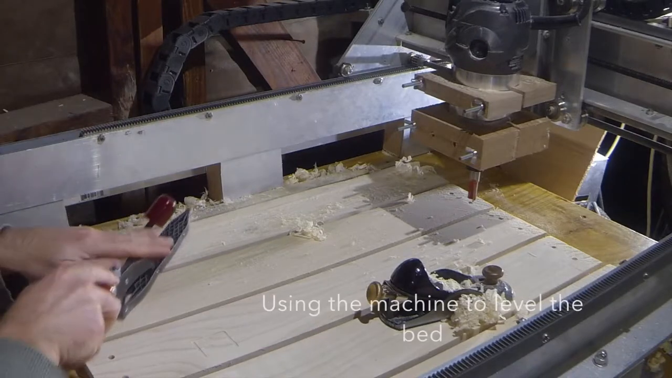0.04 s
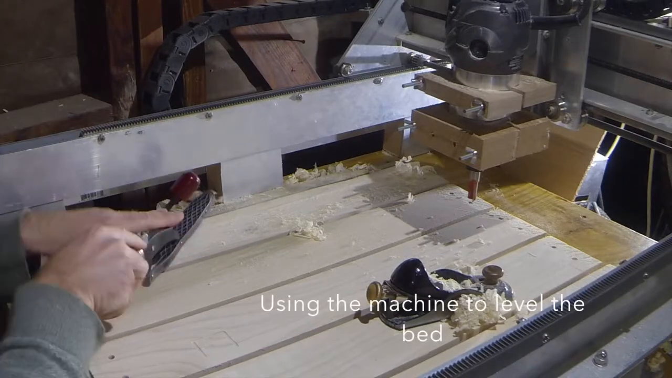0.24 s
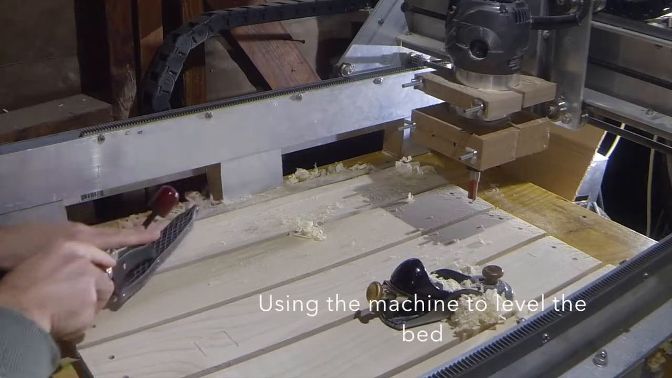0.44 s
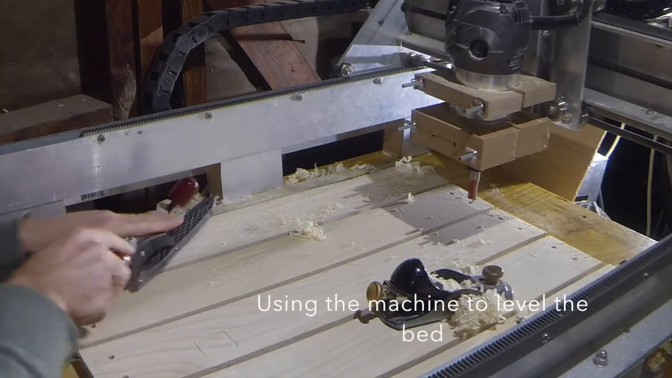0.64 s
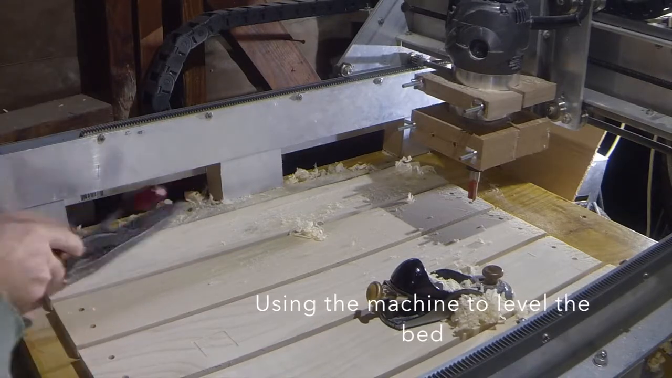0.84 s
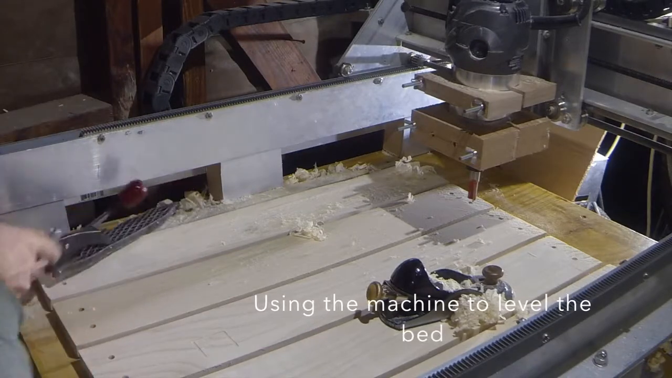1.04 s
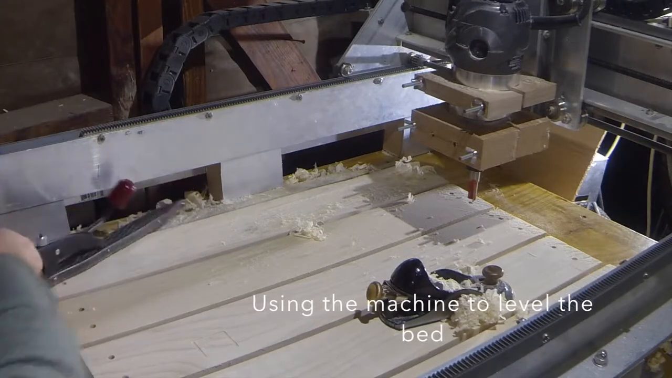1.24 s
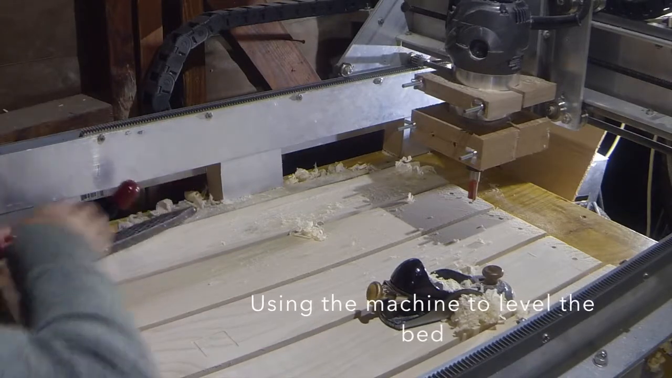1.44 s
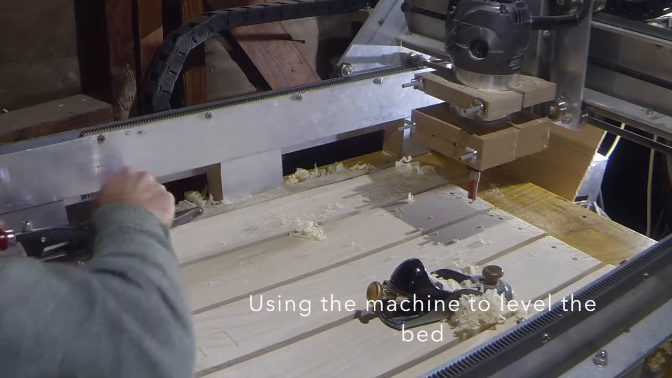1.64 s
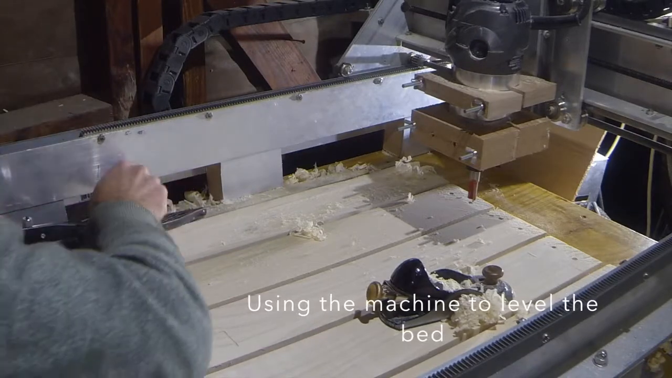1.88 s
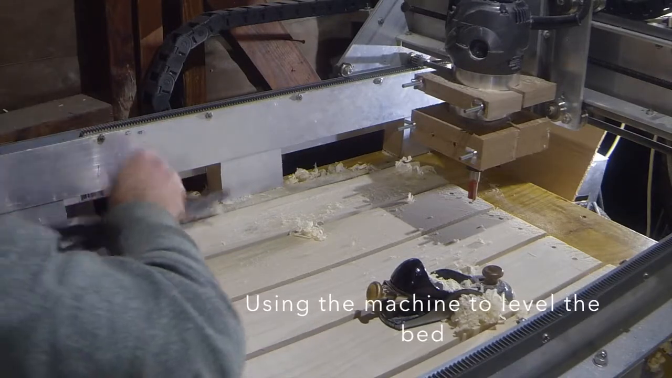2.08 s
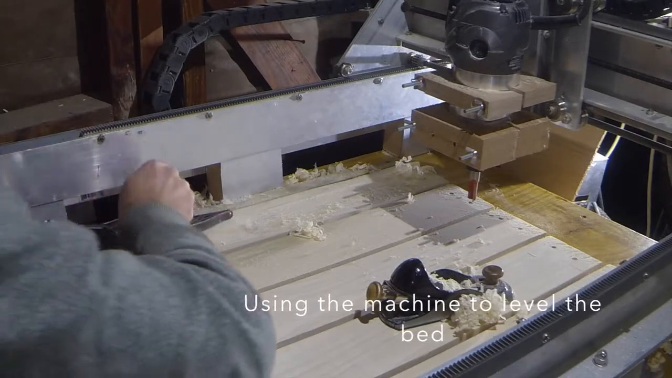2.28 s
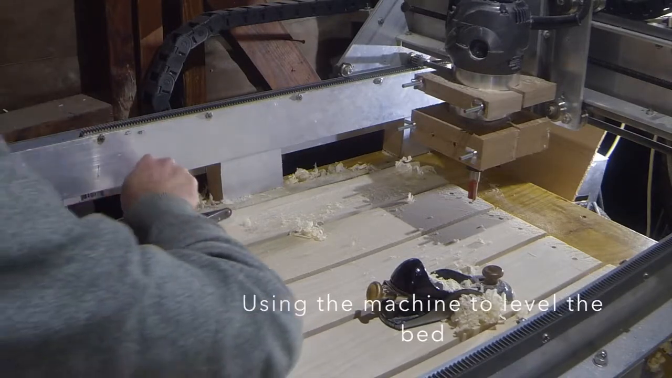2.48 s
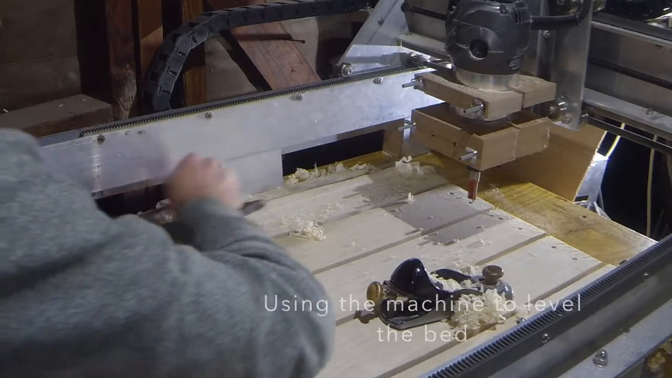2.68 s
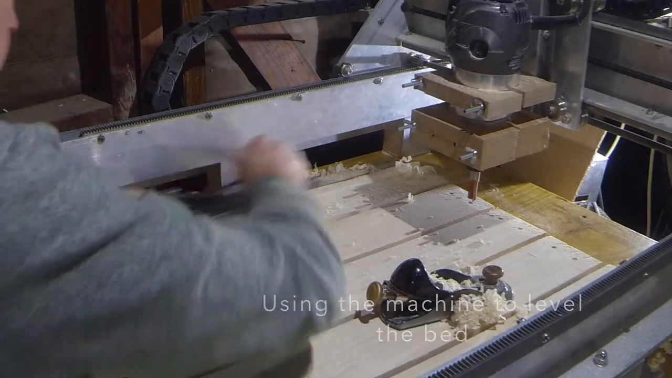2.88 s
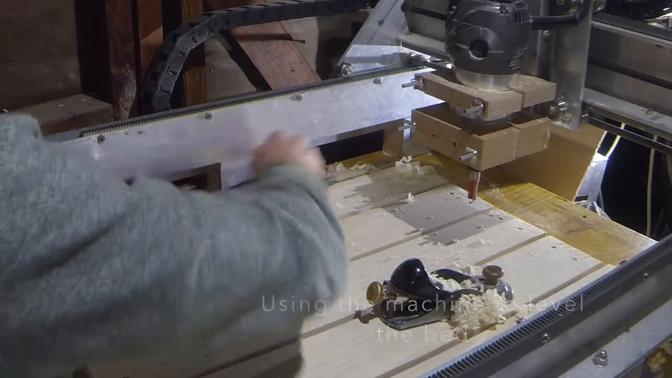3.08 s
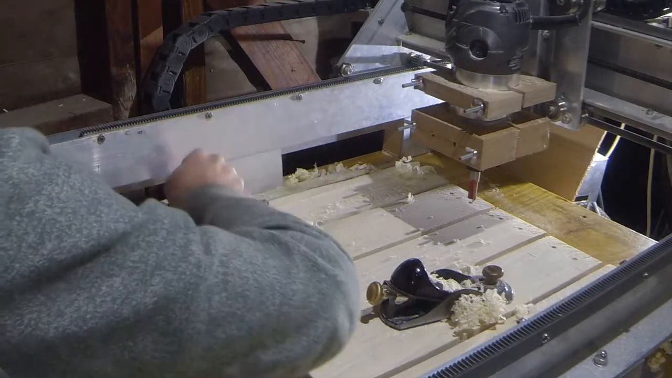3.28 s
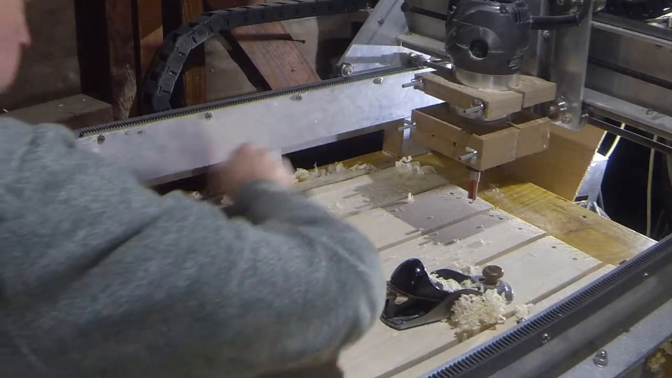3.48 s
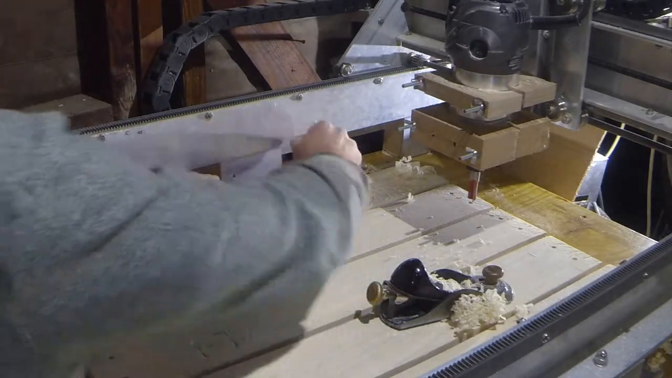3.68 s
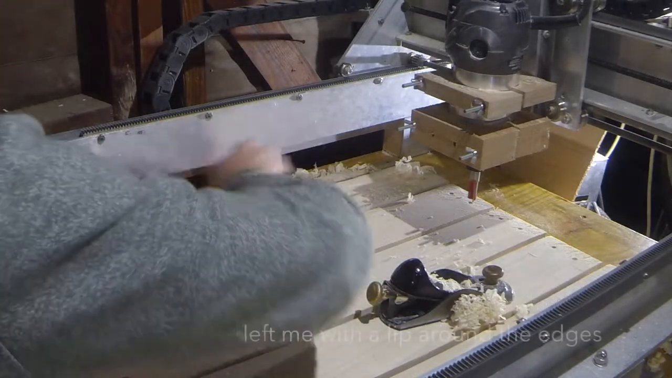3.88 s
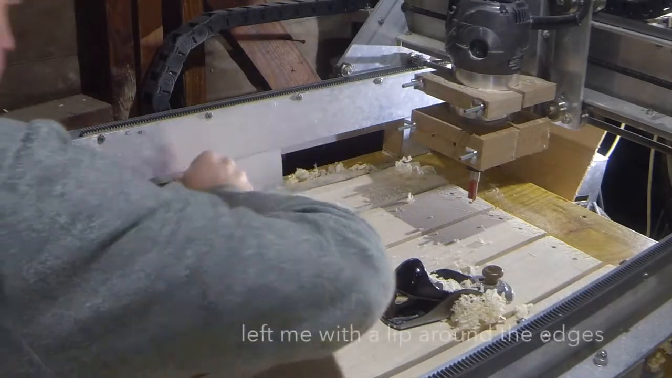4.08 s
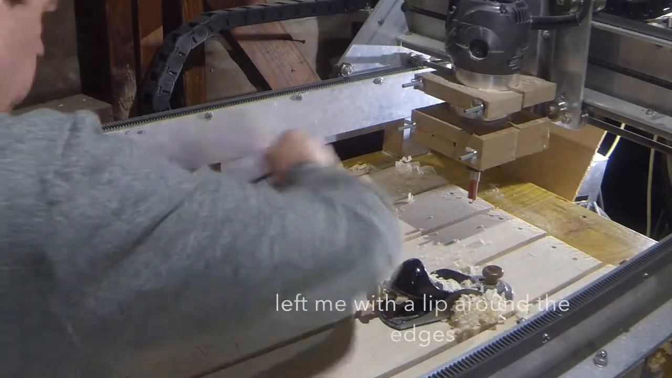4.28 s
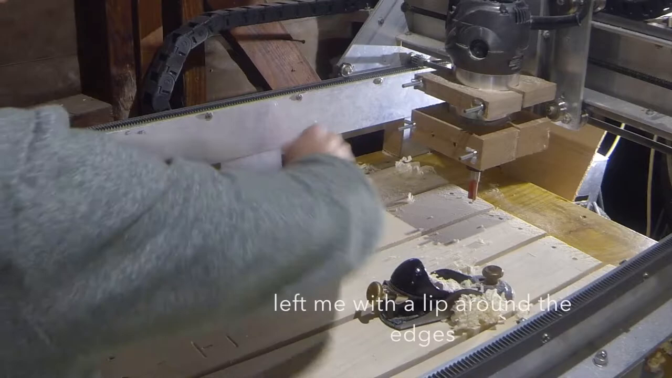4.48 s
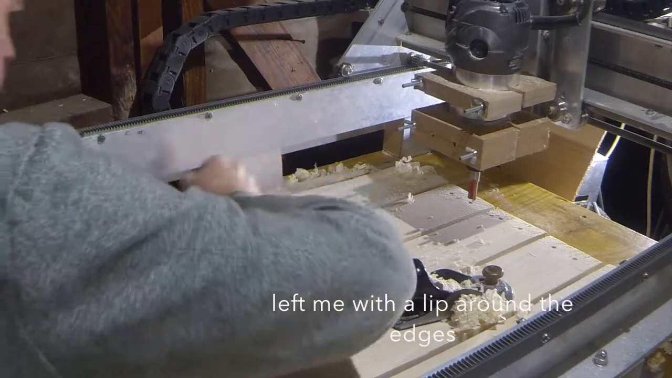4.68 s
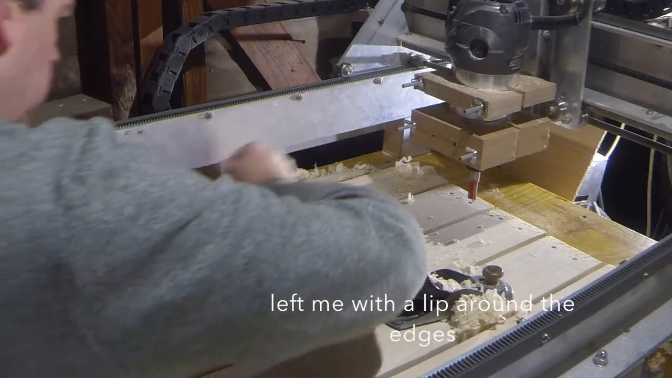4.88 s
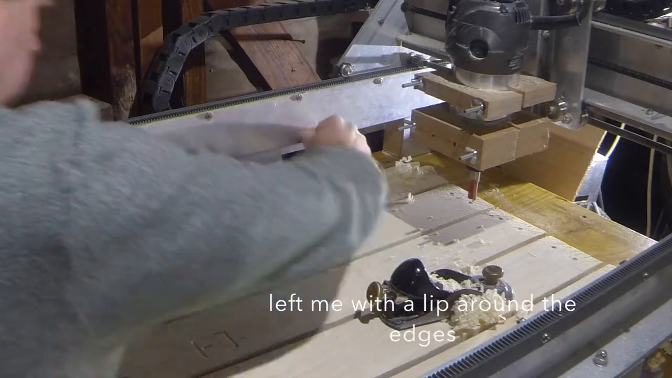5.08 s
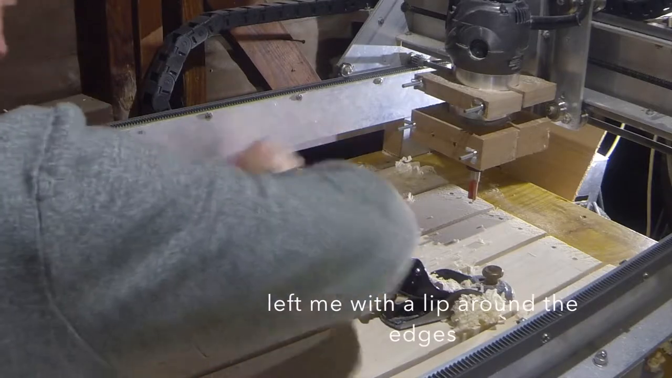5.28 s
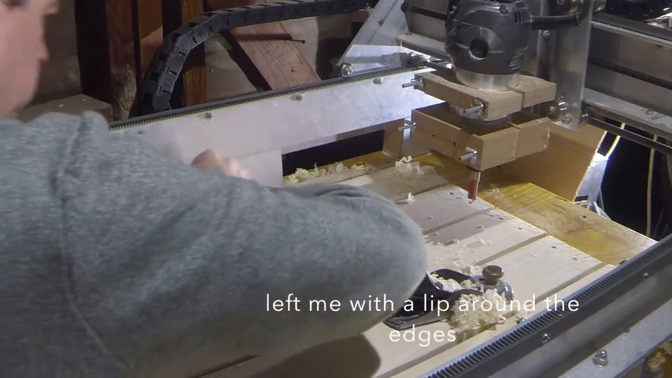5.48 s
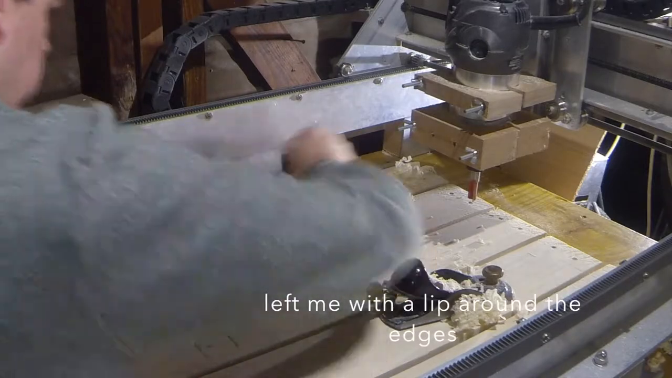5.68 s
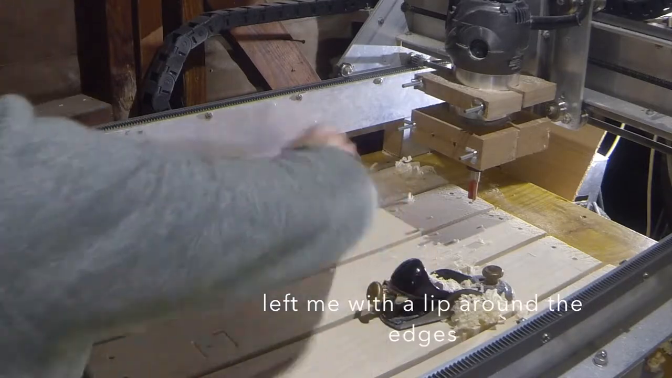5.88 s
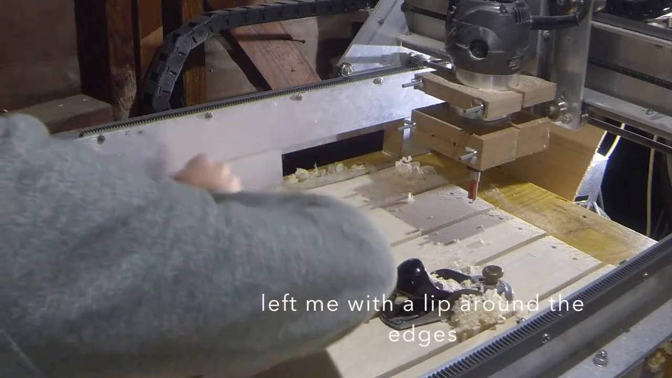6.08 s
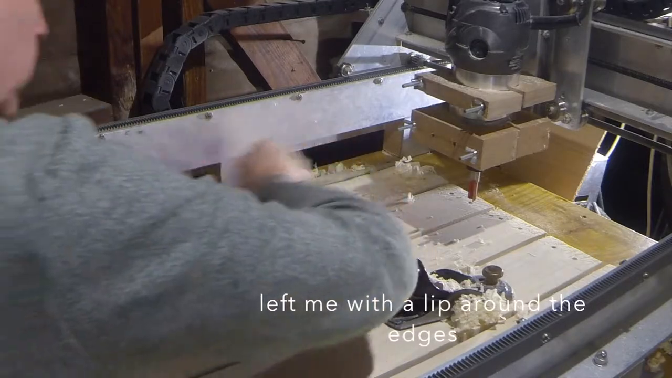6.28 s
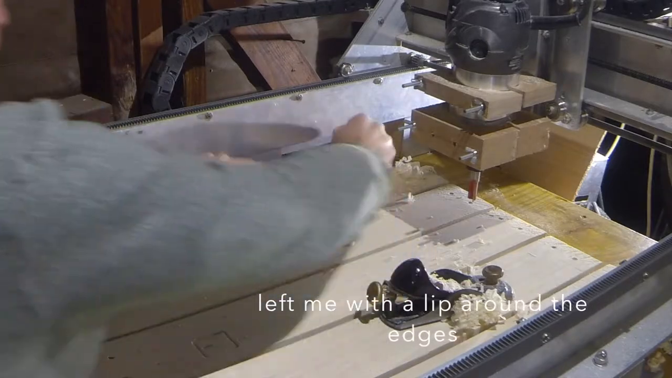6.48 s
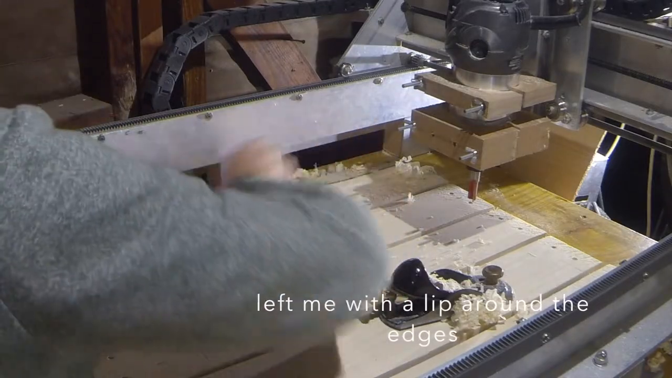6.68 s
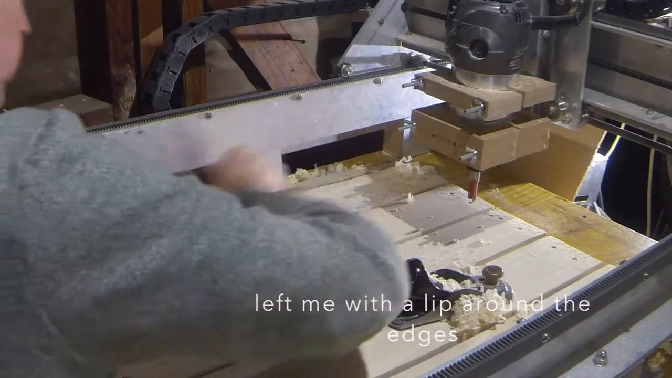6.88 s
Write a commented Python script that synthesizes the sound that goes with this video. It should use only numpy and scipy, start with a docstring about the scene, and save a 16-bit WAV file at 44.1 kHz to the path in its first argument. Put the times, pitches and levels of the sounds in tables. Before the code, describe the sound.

A hand rasp scrapes a wooden bed in short strokes, pauses for one sharp knock, then settles into long rhythmic pushes with lighter drags back.

```python
"""Hand rasp on a wooden bed

A hand rasp works the edge of a wooden machine bed in a small workshop: short strokes, a pause in which the
tool is turned round and set down with a sharp knock, then long even pushes with lighter drags back between.
Teeth are random chips plus noise, ringing the boards' resonances, louder and brighter with the hand's speed.
Knocks are decaying sines with ringing boards; frame rumble, shop air and room reverberation lie behind.
"""
import sys
import numpy as np
from scipy import signal
from scipy.io import wavfile
from scipy.ndimage import uniform_filter1d

SR = 44100
rng = np.random.default_rng(int(sys.argv[2]) if len(sys.argv) > 2 else 0)


def store_wav(level_fs):
    """Save 16-bit WAV to argv[1]."""
    pcm = np.round(np.clip(np.atleast_2d(level_fs), -1, 1) * 32767)
    wavfile.write(sys.argv[1], SR, pcm.T.astype(np.int16))


N = 306054
TIME_S = np.arange(N) / SR
HALF_S = SR // 2  # samples in half a second


# Strokes: (start [s], end [s], fastest point [share of stroke], bite of the teeth [dB before group trim],
# weight on the boards [dB re bite], sharpness of the cut [dB re bite])
# Short strokes to and fro, before the tool is turned round
NIBBLES = [(-0.082, 0.226, 0.65, -37.5, -3.5, -6), (0.203, 0.465, 0.38, -39.5, -1, -10.5),
           (0.432, 0.626, 0.44, -37, -2.5, -7.5), (0.584, 0.93, 0.31, -48, 0.5, -8)]
# The tool brushes the wood while the grip changes: same columns
BRUSHES = [(1.14, 1.284, .6, -64.5, -12, -4), (1.22, 1.395, 0.12, -64, 12, -12),
           (1.297, 1.48, 0.27, -56, -5, -7.5), (1.557, 1.775, 0.078, -63.5, -10, -5),
           (1.822, 1.969, 0.38, -58.5, -27, -6)]
# Long cutting strokes: same columns
PUSHES = [(2.41, 2.968, 0.77, -39.5, -6.5, -8), (3.262, 3.656, 0.73, -36, -4.5, -7.5),
          (3.99, 4.347, 0.7, -33, -6.5, -8), (4.667, 5.053, 0.66, -33.5, -6, -8.5),
          (5.38, 5.741, 0.6, -32, -6, -9), (6.062, 6.446, 0.66, -32, -6, -8.5),
          (6.738, 7.105, 0.51, -31, -6, -8)]
# The rasp is dragged back: same columns
DRAGS = [(2.936, 3.249, 0.5, -42.5, -5, -3), (3.64, 3.958, 0.52, -40, -7, -4),
         (4.358, 4.674, 0.37, -41.5, 1, -4.5), (5.056, 5.385, 0.4, -39.5, -6.5, -4.5),
         (5.743, 6.075, 0.44, -42, -0.5, -3), (6.439, 6.746, 0.47, -38, -6, -3.5)]
# Growth of gain with hand speed: (boards [exponent], rasping [exponent], hiss [exponent])
NIBBLE_LAW = (1.24, 2.15, 3.04)
PUSH_LAW = (1.08, 1.44, 1.66)
DRAG_LAW = (0.26, 0.85, 1.63)
# Scrape colour per way of moving the tool: (frequency [Hz], relative gain [dB])
NIBBLE_COLOUR = [(76, -18), (130, -3), (282, 2), (531, 0), (744, -8), (908, -4.5), (1220, -11.5),
                 (1550, -7), (1750, -14.5), (1850, -11), (2310, -14), (3360, -19.5), (4620, -26),
                 (7140, -33.5), (14900, -58)]
PUSH_COLOUR = [(76, -65), (130, -23), (172, -8.5), (227, -4), (260, 0), (501, 2), (587, -8.5), (674, 3),
               (872, -2), (1110, 4), (1970, -10.5), (4260, -22), (4900, -26), (8710, -36.5), (14900, -57)]
DRAG_COLOUR = [(76, -51), (130, -34), (168, -0.5), (231, -12), (260, -4), (419, 4.5), (575, 2), (806, 4),
               (1270, 4), (2130, -14.5), (2310, -17.5), (3430, -24.5), (4800, -31), (9060, -45),
               (14900, -64)]
# Teeth dig in deeper (or shallower) for a moment: (middle [s], length [s], level change [dB])
DIGS = [(0.098, 0.051, 1.5), (0.534, 0.059, 1.5), (2.514, 0.21, 3), (2.828, 0.16, 3.5), (3.46, 0.18, 3),
        (4.079, 0.02, 3), (4.285, 0.037, 2), (4.715, 0.046, 5.5), (4.983, 0.11, 1.5), (5.195, .05, -1.5),
        (6.37, 0.033, 4), (6.497, 0.072, 5)]
PRESSURE_RMS_DB, PRESSURE_HZ = 0.84, 10.4


def rasp():
    """Short strokes, cutting pushes and sliding returns under the uneven pressure of the hand."""
    nibbling = teeth(chips_per_s=1500, spread_db=0.5, rub=1.0, grab_db=1.5, grab_hz=90)
    cutting = teeth(chips_per_s=1800, spread_db=1.5, rub=0.88, grab_db=0.5, grab_hz=79)
    cutting = travel(cutting, patchy_db=2.02, patch_hz=170, patch_s=0.04)
    sliding = teeth(chips_per_s=3000, spread_db=-1.5, rub=0.55, grab_db=-0.13, grab_hz=60)
    sliding = travel(sliding, patchy_db=3.5, patch_hz=130, patch_s=0.06)

    nibbles = amp(-1.1) * scrape(NIBBLES + BRUSHES, NIBBLE_LAW, nibbling, NIBBLE_COLOUR)
    pushes = amp(-0.32) * scrape(PUSHES, PUSH_LAW, cutting, PUSH_COLOUR)
    drags = amp(-0.93) * scrape(DRAGS, DRAG_LAW, sliding, DRAG_COLOUR)

    digs_db = sum(db * swell(middle_s, length_s) for middle_s, length_s, db in DIGS)
    pressure_db = PRESSURE_RMS_DB * wander(PRESSURE_HZ) + digs_db
    return amp(pressure_db) * (nibbles + pushes + drags)


STICK_S, STICK_DB = 0.036, -6  # teeth stick at the start of a stroke, then break loose


def scrape(strokes, law, drive, spectrum, body_hz=600, edge_hz=2000):
    """Teeth drive the bed; each band's gain grows as its own power of hand speed."""
    sound = colour(drive + boards(drive), spectrum)
    body = below(sound, body_hz)
    dull = below(sound, edge_hz)
    bands = (body, dull - body, sound - dull)  # boards, rasping, hiss

    power = np.zeros((3, N))
    for start_s, end_s, fastest, bite_db, weight_db, sharp_db in strokes:
        pace = speed(start_s, end_s, fastest)
        moving = pace > 0
        stuck = 1.0 * (TIME_S[moving] < start_s + STICK_S)
        stuck_db = STICK_DB * uniform_filter1d(stuck, size=200)
        levels_db = (bite_db + weight_db, bite_db, bite_db + sharp_db)
        for band, db in enumerate(levels_db):
            gain = amp(db + stuck_db) * pace[moving] ** abs(law[band])
            power[band, moving] += gain ** 2
    return sum(np.sqrt(p) * unit(part) for p, part in zip(power, bands))


def teeth(chips_per_s, spread_db, rub, grab_db, grab_hz):
    """Chips of uneven size snap off over a smooth rub; rows of teeth grab and let go."""
    size = amp(spread_db * np.minimum(rng.exponential(1, N), 4))
    snaps = rng.random(N) < chips_per_s / SR
    chips = size * rng.choice([-1, 1], N) * snaps
    grab = unit(below(rng.standard_normal(N + SR), grab_hz, order=2)[HALF_S:][:N])
    return (unit(chips) + rub * rng.standard_normal(N)) * amp(grab_db * grab)


def travel(x, patchy_db, patch_hz, patch_s, size=1024):
    """As the contact slides along the board, narrow bands catch and fade at random."""
    overlap = size * 3 // 4
    hz, t, z = signal.stft(x, SR, nperseg=size, noverlap=overlap)
    patches = rng.standard_normal(z.shape)
    patches = uniform_filter1d(patches, max(round(patch_hz / hz[1]), 1), axis=0)
    patches = uniform_filter1d(patches, max(round(patch_s / t[1]), 1), axis=1)
    patched = z * amp(patchy_db * unit(patches))
    return signal.istft(patched, SR, nperseg=size, noverlap=overlap)[1][:N]


# Resonances of the bed with the rasp on it: (frequency [Hz], width [Hz], gain over the drive [dB])
BED_MODES = [(170.6, 10.4, 13), (272, 8.7, 16), (307, 11.5, 9), (316, 7.8, 9), (356.8, 19, 13.5),
             (427, 16, 9.5), (516, 60, 3), (646, 23, -3), (721, 28, -2.5), (753, 49, -12.5), (807, 17.5, 3),
             (941, 62, -4.5), (1018, 19, -3.5), (1150, 28, -8.5), (1298, 22, 1.5), (1494, 34, 3),
             (1597, 37, -0.5), (1627, 4.1, 11), (1850, 10, -30), (2133, 55, 3.5), (2590, 48, -6),
             (2886, 72, 5.5), (3397, 310, 5.5), (3730, 400, 4), (4270, 160, 8), (5150, 190, -2.5),
             (6700, 1100, -7), (8650, 200, 0)]


def boards(x):
    """Bed modes ring under drive x; a wider resonance dies sooner."""
    t = TIME_S[:HALF_S]
    ring = np.zeros(HALF_S)
    for hz, width_hz, db in BED_MODES:
        decay = np.exp(-np.pi * width_hz * t)
        peak_scale = 2 * np.pi * width_hz / SR  # same peak response at any width
        ring += amp(db) * peak_scale * decay * np.cos(2 * np.pi * hz * t)
    return signal.oaconvolve(x, ring)[:len(x)]


def speed(start_s, end_s, fastest):
    """The hand speeds up from rest and slows to rest again; top speed 1."""
    turn_s = start_s + np.clip(fastest, 0.02, 0.98) * (end_s - start_s)
    return np.sin(np.pi * np.interp(TIME_S, [start_s, turn_s, end_s], [0, 0.5, 0]))


def motion(strokes):
    """The hand's speed through a series of strokes."""
    return sum(speed(*row[:3]) for row in strokes)


# Rasp judders or squeaks for a moment: (start [s], length [s], frequency [Hz], level [dB rms])
JUDDERS = [(0.321, 0.087, 262, -35.5), (3.769, 0.018, 1070, -49), (3.754, 0.045, 3390, -50.5),
           (4.433, 0.015, 990, -35), (5.273, 0.031, 3020, -55.5), (5.85, 0.034, 2940, -52),
           (5.933, 0.018, 2960, -47)]


def judders(waver=0.012):
    """Stick and slip lock briefly onto one resonance: a wavering sine."""
    out = np.zeros(N)
    for start_s, length_s, hz, db in JUDDERS:
        drift = unit(uniform_filter1d(rng.standard_normal(SR), size=300))
        drift = drift[:round(length_s * SR)]
        tone = np.sin(2 * np.pi * np.cumsum(hz * (1 + waver * drift)) / SR)
        burst = unit(tone * signal.windows.tukey(len(tone), 0.7))
        add(out, start_s, amp(db) * burst)
    return out


# Teeth skip over the edge as the rasp is drawn off: (start [s], length [s], level [dB])
SNAGS = [(0.758, 0.014, -41), (0.776, 0.012, -37), (0.793, 0.0129, -36.5), (0.812, 0.014, -44.5)]
# Colour of the skips: (frequency [Hz], relative gain [dB])
SNAG_COLOUR = [(120, -41), (200, -36), (350, 3), (484, 3.5), (601, -17), (732, -7.5), (1870, -18.5),
               (2880, -12.5), (7000, -35), (10000, -38), (14900, -63)]


def snags():
    """Each skip tears a quick cluster of chips."""
    torn = teeth(chips_per_s=1500, spread_db=2.0, rub=0.43, grab_db=2.5, grab_hz=200)
    chips = unit(colour(torn, SNAG_COLOUR))
    grip = np.zeros(N)
    for start_s, length_s, db in SNAGS:
        add(grip, start_s, amp(db) * signal.windows.tukey(round(length_s * SR), 0.5))
    return grip * chips


# The arm's weight rocks a deep mode of the bed: (middle [s], length [s], level [dB])
ROCKS = [(2.56, 0.18, -51), (3.196, 0.065, -53), (3.745, .1, -43.5), (4.407, 0.079, -47),
         (4.505, 0.074, -50), (5.032, 0.15, -51), (5.697, 0.15, -41), (5.856, 0.067, -43),
         (6.313, 0.11, -51), (6.457, 0.28, -44.5)]


def boom(hz=173, width_hz=26, murmur_db=-58):
    """Friction keeps a deep bed mode murmuring; it swells when the arm rocks the bed."""
    band_hz = [hz - width_hz / 2, hz + width_hz / 2]
    ring = signal.lfilter(*signal.butter(2, band_hz, "band", fs=SR), rng.standard_normal(N))
    murmur = amp(murmur_db) * np.sqrt(motion(PUSHES + DRAGS))
    rocking = sum(amp(db) * swell(middle_s, length_s) for middle_s, length_s, db in ROCKS)
    return unit(ring) * (murmur + rocking)


# Tool knocks on the bed: (time [s], crack peak [dB], cutoff above which the blow is dull [Hz],
# drive to the boards [dB before ring_db], clink of the blade [dB re crack, before softening])
KNOCKS = [(0.764, -40, 900, 8, -24), (0.977, -51, 1980, 3, -6), (1.239, -42, 895, 5, -24),
          (1.459, -47.5, 500, -2, -28), (2.0437, -36.5, 2200, -11, 1), (2.0464, -22, 395, -8, -43),
          (2.0893, -9, 2100, -0.5, -23)]
# Short crack of the tool's frame: (frequency [Hz], relative level [dB], t60 [s])
CRACK_MODES = [(325, -8.5, 0.055), (540, 1.5, 0.04), (785, 4, 0.04), (930, -7, 0.025), (1024, 18.5, 0.015),
               (1570, 8, 0.039), (1870, -10, .035), (2164, -7.5, .04), (2450, -19, 0.025), (2800, -15, .04)]
# Steel blade: (frequency [Hz], relative level [dB], t60 [s])
BLADE_MODES = [(2170, -5, .025), (2850, -3, 0.027), (3130, 2, .022), (3470, 1.5, 0.026), (3770, -6, .03),
               (4220, -7, 0.022), (5350, -16, .025), (7200, -30, .02)]
# Tool settling on the wood after a blow: (frequency [Hz], relative gain [dB])
CLATTER_COLOUR = [(180, -45), (300, -13), (447, -6.5), (577, -14), (1590, -24.5), (2570, -32.5),
                  (3230, -39), (5240, -64), (9000, -68), (11700, -100), (19800, -120)]
# Reflections off the gantry and the wall: (delay [s], level [dB])
ECHOES = [(.0042, -11.5), (.0098, -13)]
CLATTER_T60_S = 0.14


def knocks(ring_db=4, push_hz=650, held_t60_s=0.5, clatter_db=-17, clink_hz=5000):
    """The tool cracks, clinks and settles; its slower push rings the hand-damped boards."""
    out = np.zeros(N)
    t = TIME_S[:HALF_S]
    crack = struck(CRACK_MODES)
    clink = soften(struck(BLADE_MODES), clink_hz)
    held = np.exp(-np.log(1000) * t / held_t60_s)
    settling = np.exp(-np.log(1000) * t / CLATTER_T60_S)
    for time_s, db, hard_hz, boards_db, blade_db in KNOCKS:
        blow = soften(crack, hard_hz)
        blow = blow / abs(blow).max()
        ring = amp(ring_db + boards_db) * boards(soften(blow, push_hz)) * held
        grit = colour(rng.standard_normal(len(t)), CLATTER_COLOUR)
        clatter = amp(clatter_db) * unit(soften(grit, 2 * hard_hz)) * settling
        tool = blow + amp(blade_db) * clink
        add(out, time_s, amp(db) * (tool + ring + clatter + thud()))
        for delay_s, echo_db in ECHOES:
            add(out, time_s + delay_s, amp(db + echo_db) * tool)
    return out


# The bed's low modes under a blow: (frequency [Hz], relative level [dB], t60 [s])
THUD_MODES = [(159, -13, 0.35), (263.4, 2, .17), (283, -14, .15), (434, 2.5, 0.11)]


def thud(db=-10, rise_s=0.011):
    """The bed's low modes build up just after a blow."""
    rise = 1 - np.exp(-TIME_S[:HALF_S] / rise_s)
    return amp(db) * struck(THUD_MODES) * rise


def struck(modes):
    """Dying sines of a struck thing, neighbouring modes swinging opposite ways; peak 1."""
    t = TIME_S[:HALF_S]
    ring = np.zeros(HALF_S)
    for k, (hz, db, t60_s) in enumerate(modes):
        ring += (-1) ** k * amp(db - 60 * t / t60_s) * np.sin(2 * np.pi * hz * t)
    return ring / abs(ring).max()


def soften(x, hz):
    """Causal low-pass: a longer contact dulls a blow."""
    return signal.lfilter(*signal.butter(2, min(hz, SR / 3), fs=SR), x)


# Reverberation of the shop: (frequency [Hz], t60 [s])
SHOP_T60 = [(150, 0.47), (500, 0.27), (1500, 0.32), (4000, 0.29), (12000, 0.3)]


def shop(x, first_s=0.005):
    """A dense tail of reflections, each band dying at its own speed."""
    reflections_per_s = 4000
    taps = rng.standard_normal(HALF_S) * (rng.random(HALF_S) < reflections_per_s / SR)
    hz, t, z = signal.stft(taps, SR, nperseg=256)
    decay = amp(-60 * t / read(SHOP_T60, hz)[:, None])
    tail = signal.istft(z * decay, SR, nperseg=256)[1]
    tail = np.pad(tail / np.linalg.norm(tail), (round(first_s * SR), 0))
    return signal.oaconvolve(x, tail)[:N]


# Rumble of the heavy frame: (frequency [Hz], relative gain [dB])
FRAME_COLOUR = [(8.8, -35), (15, 7), (38, 0.5), (76, -3.5), (108, -28.5), (130, -28), (170, -32),
                (290, -120)]
# The heavy frame sways after a shove: (middle [s], length [s], level [dB])
LURCHES = [(0.613, 0.33, -41), (2.178, 0.42, -42.5), (3.675, 0.19, -40), (4.36, 0.57, -44.5)]
# The quiet shop: (frequency [Hz], relative gain [dB])
AIR_COLOUR = [(59, -17), (100, 3.5), (273, -4.5), (501, -13), (556, -18.5), (828, -17.5), (2260, -25.5),
              (3090, -25.5), (7940, -35.5), (9380, -35.5), (12300, -40.5), (14900, -55)]
SWAY_REST_DB, SWAY_WORK_DB = -53.5, -54.5  # rumble at rest; amplitude added at full hand speed
AIR_DB = -60


def background():
    """The frame rumbles under the work, over the steady air of the shop."""
    shaking = amp(SWAY_REST_DB) + amp(SWAY_WORK_DB) * motion(NIBBLES + PUSHES + DRAGS)
    lurching = sum(amp(db) * swell(middle_s, length_s) for middle_s, length_s, db in LURCHES)
    rumble = unit(colour(rng.standard_normal(N), FRAME_COLOUR))
    air = unit(colour(rng.standard_normal(N), AIR_COLOUR))
    return rumble * np.hypot(shaking, lurching) + amp(AIR_DB) * air


def amp(db):
    """Decibels to gain."""
    return 10 ** (np.asarray(db) / 20)


def unit(x):
    """Scales to rms 1."""
    return x / np.sqrt(np.mean(x ** 2) + 1e-20)


def read(points, hz):
    """Reads a table on a log-frequency axis."""
    f, value = np.transpose(points)
    return np.interp(np.log(hz + 1), np.log(f + 1), value)


def add(mix, time_s, sound):
    """Mixes a sound in at a given time."""
    part = mix[round(time_s * SR):][:len(sound)]
    part += sound[:len(part)]


def colour(x, spectrum, size=8192):
    """Causal minimum-phase filter with the given spectrum; clicks keep their sharp front."""
    gain_db = read(spectrum, abs(np.fft.fftfreq(size, 1 / SR)))
    log_gain = np.log(amp(np.maximum(gain_db, -100)))
    taps = np.fft.ifft(np.exp(np.conj(signal.hilbert(log_gain)))).real
    return signal.oaconvolve(x, taps[:size // 2])[:len(x)]


def below(x, hz, order=4):
    """Low-pass without delay."""
    return signal.sosfiltfilt(signal.butter(order, hz, fs=SR, output="sos"), x)


def wander(hz):
    """Slow random drift of rms 1."""
    return unit(below(rng.standard_normal(N + 2 * SR), hz, order=2)[SR:][:N])


def swell(middle_s, length_s):
    """A smooth rise and fall of height 1."""
    return np.cos(np.pi * np.clip((TIME_S - middle_s) / length_s, -0.5, 0.5)) ** 2


def scene():
    """Scraping and knocks in the room, over the background; one channel."""
    scraping = rasp() + judders() + snags()
    hits = knocks()
    room = shop(amp(-11.0) * scraping + amp(-12.0) * hits)
    return (scraping + boom() + hits + room + background())[None]


EDGE_HZ = 15000


def record(dry):
    """Steep zero-phase low-pass: the upper band limit."""
    return signal.sosfiltfilt(signal.ellip(10, 0.05, 60, EDGE_HZ, fs=SR, output="sos"), dry)


dry = scene()
out = record(dry)
store_wav(out)
```